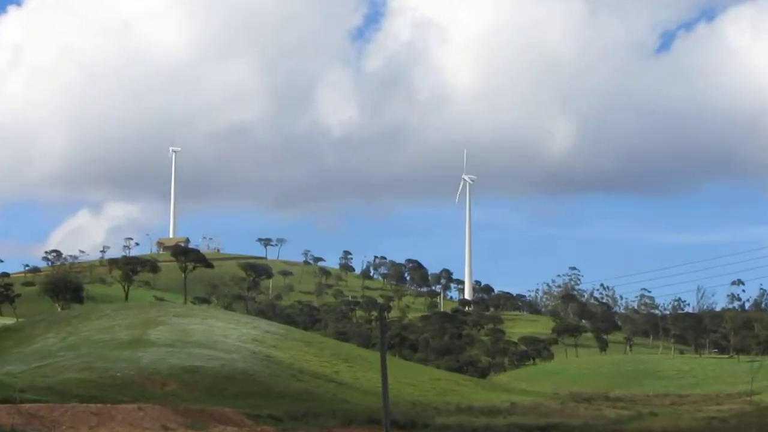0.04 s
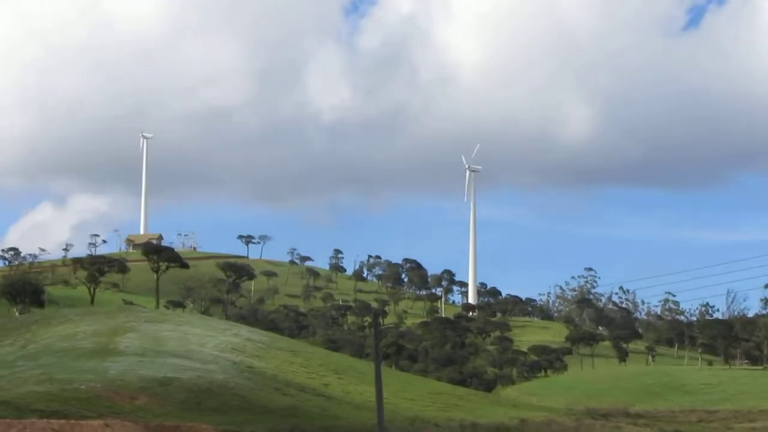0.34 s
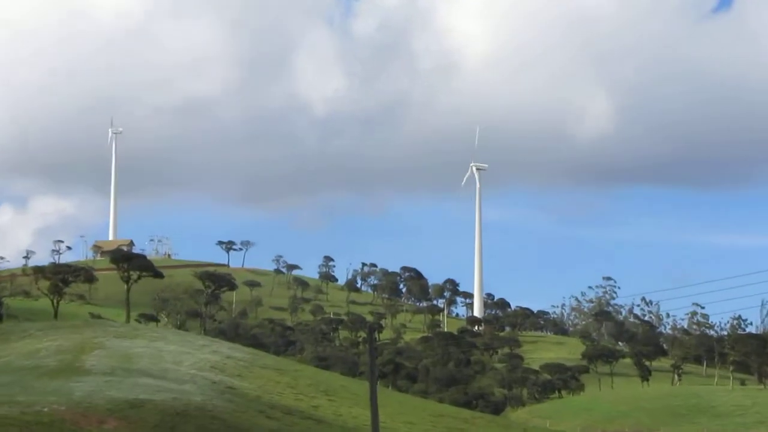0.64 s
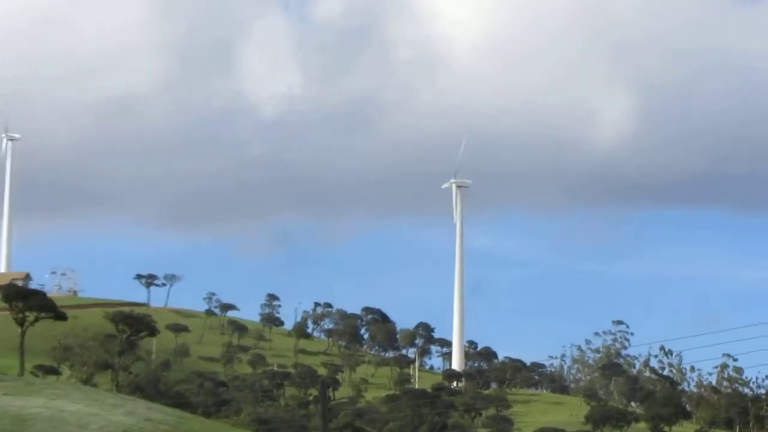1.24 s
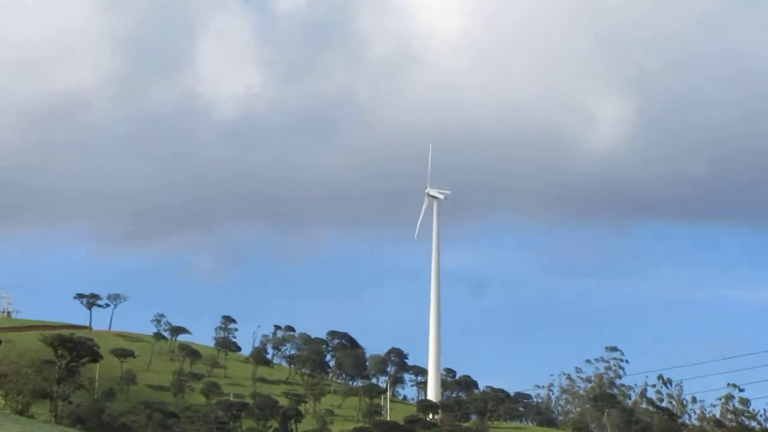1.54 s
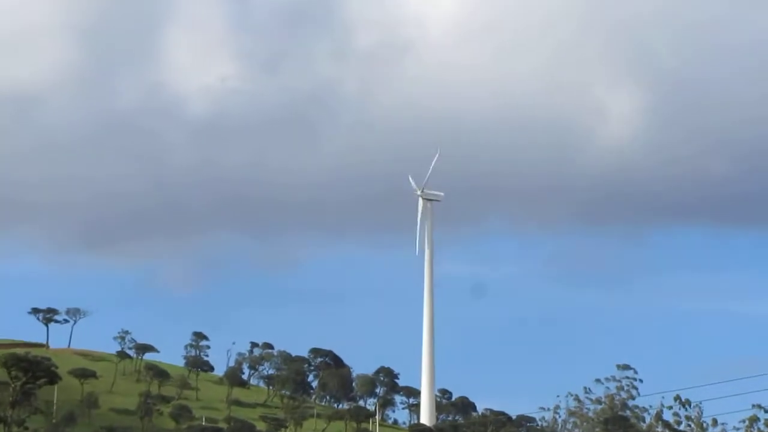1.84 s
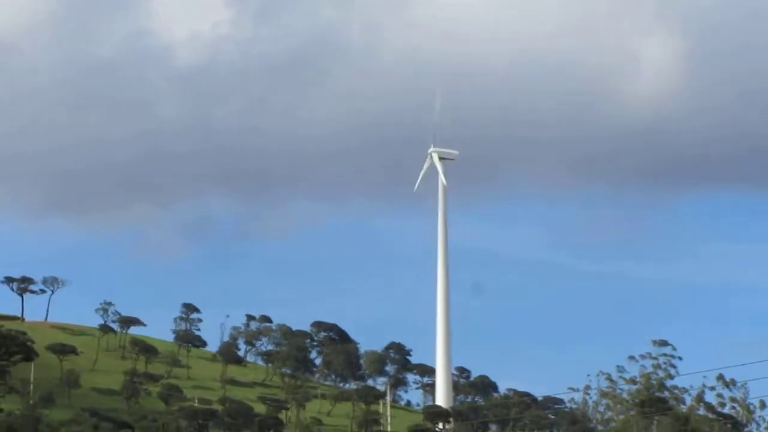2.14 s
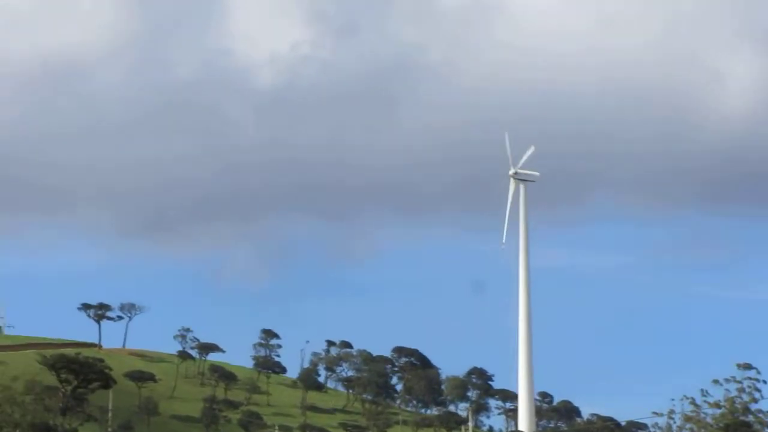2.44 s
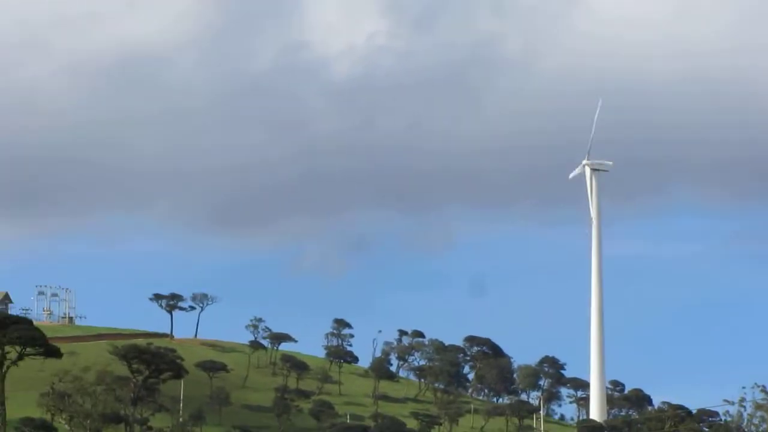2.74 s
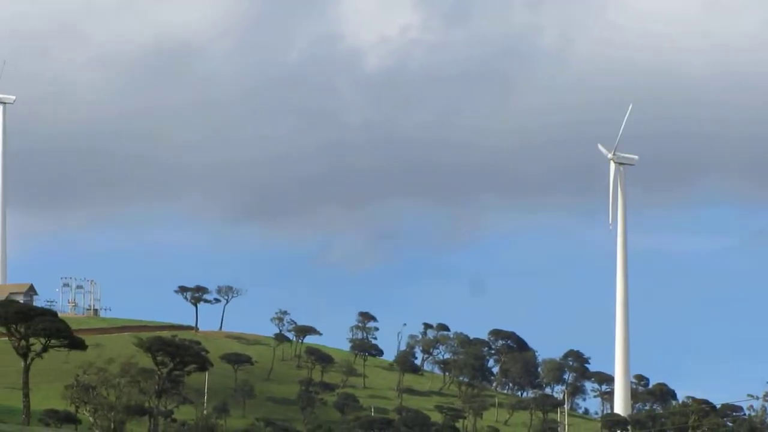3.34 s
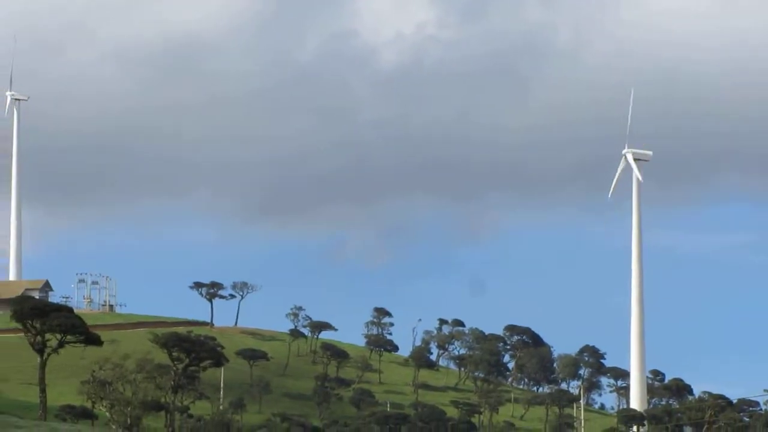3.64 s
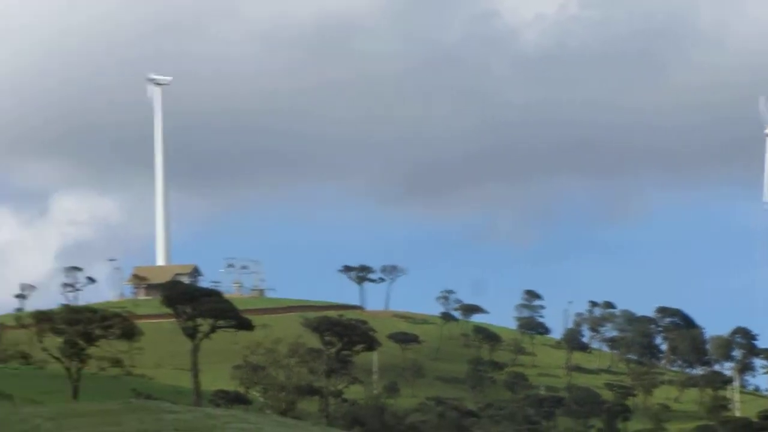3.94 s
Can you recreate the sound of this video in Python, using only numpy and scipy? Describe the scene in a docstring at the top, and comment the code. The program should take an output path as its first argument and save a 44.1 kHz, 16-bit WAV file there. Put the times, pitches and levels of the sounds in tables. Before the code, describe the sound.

Gusty wind rumbles against the microphone on an open hillside, turning rough and crackly.

```python
"""Wind buffets a camera's microphone in gusts on an open hillside. Eddies carry pressure fluctuations past the
port: a fluttering rumble that brightens and crackles as the air speeds up. The hardest eddies slap, and three
crisp clicks sound on both sides. The right channel is a duller, nearly inverted copy of the left. A faint hiss
lies below, and a limiter holds the peaks down."""
import sys
import numpy as np
from scipy import signal
from scipy.fft import rfft, irfft
from scipy.io import wavfile
from scipy.ndimage import uniform_filter1d, minimum_filter1d

SR = 44100
rng = np.random.default_rng(int(sys.argv[2]) if len(sys.argv) > 2 else 0)


def inscribe(sig):
    """Save sig as 16-bit PCM at rate SR to the path in sys.argv[1].

    A 1-D sig is mono; a 2-D sig holds one channel per row.
    Samples are clipped to [-1, 1] before scaling.
    """
    pcm = np.round(np.clip(np.atleast_2d(sig).T, -1, 1) * 32767)
    wavfile.write(sys.argv[1], SR, pcm.astype(np.int16))


N = 176400
TIME = np.arange(N) / SR
HZ = np.fft.rfftfreq(N, 1 / SR)

# wind at the microphone: t/s, relative level/dB, eddy rate/Hz (higher in faster air)
WIND_GUSTS = [(0.0, 4.5, 130), (0.012, -5, 102.7), (0.041, -6.5, 85), (0.074, -33, 140.6), (0.154, -2, 102),
              (0.197, -19.5, 113), (0.216, -4.5, 112.5), (0.341, -5, 138.4), (0.368, -9, 186.7),
              (0.388, -20.5, 89.5), (0.427, -4, 120.7), (0.483, -22, 109.5), (0.501, -6.5, 102.8),
              (0.519, -23, 79), (0.545, -2.5, 132.8), (0.599, -9, 141.4), (0.61, -6, 191),
              (0.658, -15.5, 89.3), (0.708, -6, 242), (0.735, -8, 140), (0.77, -5.5, 277),
              (0.782, -20, 148), (0.794, -8.5, 179.3), (0.899, -6.5, 263), (0.916, -12.5, 154),
              (0.973, -6, 246), (0.999, -6.5, 163), (1.061, -8, 213), (1.157, -7, 216.5),
              (1.172, -11, 150.3), (1.246, -6.5, 210.4), (1.288, -12, 106), (1.315, -3, 175),
              (1.356, -12.5, 123.7), (1.415, -2, 216), (1.443, -14, 182), (1.467, -2.5, 282),
              (1.481, -16.5, 120.4), (1.505, -8, 100.3), (1.509, -18.5, 194.5), (1.539, 0.5, 427),
              (1.576, -17.5, 131), (1.62, -6.5, 408), (1.653, -4, 169.3), (1.721, -3.5, 298),
              (1.755, -2.5, 254), (1.776, -15.5, 142), (1.798, -12.5, 161), (1.812, 3, 241),
              (1.842, -17, 187), (1.855, -11.5, 279), (1.911, -3, 285), (1.923, -12.5, 210),
              (1.973, -7.5, 159.7), (1.988, -19.5, 298), (2.0, -4.5, 320), (2.172, -7, 282),
              (2.192, -10.5, 192.7), (2.267, -5.5, 395), (2.328, -6.5, 279), (2.373, -7, 275),
              (2.406, -11, 206.5), (2.522, -6, 481), (2.558, -14.5, 268.4), (2.605, -3, 308),
              (2.648, -13.5, 220), (2.668, -2, 409), (2.735, -16, 211), (2.797, -5.5, 269),
              (2.818, -13, 257), (2.897, -4.5, 170), (2.925, -6.5, 257.5), (3.046, -9, 214),
              (3.059, -2.5, 231.3), (3.12, -13, 188), (3.136, -6, 234.6), (3.206, -10, 187.5),
              (3.274, -1.5, 235), (3.298, -7.5, 176), (3.36, -10, 317), (3.458, -6.5, 208.5),
              (3.47, -11, 181.4), (3.488, 0.5, 214), (3.511, -13.5, 154.5), (3.529, -5.5, 616),
              (3.549, -13.5, 168.6), (3.584, -10, 296), (3.604, -5.5, 144), (3.633, -9.5, 221.4),
              (3.702, -10.5, 183), (3.714, -7, 287), (3.733, -11.5, 340), (3.753, -11.5, 118),
              (3.791, -6.5, 189.4), (3.805, -33.5, 141), (3.824, -6.5, 301), (3.893, -13.5, 197),
              (3.905, 1, 206), (3.916, -14.5, 260), (3.993, -9, 105.5)]
# response of the microphone port: f/Hz, gain/dB
PORT_RESPONSE = [(20, -30.5), (35, -21.5), (55, -10), (90, -2.5), (140, 5), (250, 5), (460, 3.58),
                 (750, 3.76), (1150, 5.5), (1700, 2.85), (2400, 1), (3100, -2), (3900, -10), (6000, -14.5),
                 (12000, -22.5)]
# hard slaps of air: t/s, relative snap level/dB, relative body level/dB
AIR_SLAPS = [(1.1096, -65.5, -20), (1.2209, -69.5, -24), (1.463, -67.5, -20), (1.5395, -53.5, -20),
             (1.6182, -57.5, -18.5), (1.623, -58.5, -27.5), (1.8132, -51, -25.5), (1.8572, -63, -18),
             (1.8815, -58.5, -29.5), (1.9054, -53.5, -22.5), (1.9959, -50.5, -26.5), (2.0126, -51, -25),
             (2.0408, -56, -18.5), (2.0667, -50, -19), (2.1144, -51, -24), (2.1408, -55, -37),
             (2.2089, -62.5, -20), (2.2644, -41.5, -22.5), (2.2799, -50, -19), (2.3343, -59, -21),
             (2.4358, -64, -19), (2.5022, -54, -32), (2.601, -50.5, -23), (2.6206, -55, -17.5),
             (2.6724, -57, -18), (2.6848, -60, -21.5), (2.723, -55, -20), (3.2685, -68.5, -23.5),
             (3.4306, -58.5, -23), (3.5274, -50, -15), (3.5803, -61, -30), (3.712, -58.5, -27),
             (3.7296, -71, -21), (3.8247, -61, -16)]
# spectra of a slap's snap and of its body: f/Hz, gain/dB
SNAP_SPECTRUM = [(300, -20), (1500, 0), (3000, 0), (4200, -5), (7000, -11), (8500, -22), (10000, -36),
                 (14000, -56)]
BODY_SPECTRUM = [(30, -36), (70, -14), (150, -2), (500, 1), (1000, -1), (2000, -11), (3200, -29),
                 (5000, -60), (9000, -80)]
# crisp clicks: t/s, relative level/dB, attenuation on the right/dB
CLICK_EVENTS = [(0.3637, 16.5, 10.5), (.8935, 10.5, 12.5), (2.1637, 7, 8.5)]
# spectrum of a click: f/Hz, gain/dB
CLICK_SPECTRUM = [(30, -34), (200, 2.5), (600, 4), (1200, -4.5), (2200, -24), (3500, -33), (7000, -43),
                  (10000, -50.5), (15000, -62)]
# spectral density of the hiss: f/Hz, relative level/dB
HISS_SPECTRUM = [(100, 6), (1000, 2), (2000, 2.5), (3000, -3.5), (3500, -10), (4000, -13), (6500, -16.5),
                 (8100, -16.5), (8800, -19.5), (9600, -19), (10200, -17.5), (11200, -25.5), (13500, -24.5),
                 (15500, -34)]
# envelope of the hiss: t/s, level/dB
HISS_ENVELOPE = [(0, -63.5), (.355, -61), (.375, -67), (.85, -66), (1.35, -66.5), (1.8, -68), (2.3, -72),
                 (4, -73)]
# shading of the right channel: f/Hz, attenuation/dB
RIGHT_SHADE = [(50, 4), (170, 4.28), (500, 4.8), (800, 7.2), (1200, 9.2), (1700, 12.2), (2300, 16.4),
               (3000, 19), (6000, 42), (12000, 42)]
# phase lead of the right channel over the left: f/Hz, phase/rad
RIGHT_LEAD = [(20, 1.83), (170, 2.924), (300, 2.466), (500, 2.114), (800, 1.85), (1200, 2.16), (1700, 1.1),
              (3000, 0.27), (6000, .4)]
# likeness of the rumble in the two channels: f/Hz, correlation/1
CORRELATION = [(40, 0.89), (200, 0.93), (1000, 0.97), (3000, 1)]


def buffeting():
    """Faster flow shifts eddy pressure to higher frequencies. Gives spectra of two streams."""
    wind_db, ragged_eddy_hz = 4, 240
    pivot_hz, roll_off = 200, 0.76  # the spectrum tilts about the pivot
    times, level_db, eddy_hz = np.transpose(WIND_GUSTS)
    stirred = np.minimum(np.interp(TIME, times, eddy_hz) / ragged_eddy_hz, 1)  # slow air is smoother
    flutter = wobble(rate_hz=60)
    crackle = stirred * wobble(rate_hz=296)  # the smallest eddies
    level = amp(wind_db + np.interp(TIME, times, level_db) + flutter + 1.59 * crackle)
    eddy_rate = np.exp(np.interp(TIME, times, np.log(eddy_hz)) + .08 * flutter + .29 * crackle)
    streams = np.array([turbulence(), turbulence()]) * level
    steepness = eddy_rate ** -roll_off
    centres_hz = np.geomspace(40, 12000, 22)
    spectra = 0
    for hz, band in zip(centres_hz, np.eye(len(centres_hz))):  # overlapping triangular bands
        gain = np.exp((pivot_hz ** roll_off - hz ** roll_off) * steepness)
        spectra = spectra + rfft(streams * gain) * np.interp(HZ, centres_hz, band)
    return spectra * minimum_phase(PORT_RESPONSE)


def turbulence(kicks_per_s=220, kick_share=0.53):
    """Intermittency: single pressure kicks carry a share of the power, Gaussian churning the rest."""
    kicks = (rng.random(N) < kicks_per_s / SR) * rng.uniform(0.42, 1, N)
    churning = rng.standard_normal(N)
    return np.sqrt(1 - kick_share) * churning + np.sqrt(kick_share) * unit(kicks - kicks.mean())


def wobble(rate_hz):
    """Random modulation: the air swings as band-pass noise, falling off above the given rate."""
    ratio = HZ / rate_hz
    band_pass = ratio / (ratio + .15) / np.sqrt(1 + ratio ** 4)
    swing = unit(irfft(rfft(rng.standard_normal(N)) * band_pass, N))
    return np.clip(swing, -2.5, 2.5)


def slaps(peak_delay_s=.0012, fizz_s=.0015, fizz_db=-18.5):
    """Impulse excitation: one pressure spike gives a dull body and a ragged snap. Gives a spectrum."""
    snap, body, fizz_envelope = np.zeros((3, N))
    for start, snap_db, body_db in AIR_SLAPS:
        peak = min(round((start + peak_delay_s) * SR), N - 1)
        snap[peak], body[peak] = amp(snap_db + 34), amp(body_db + 35)
        fizz_envelope += snap[peak] * np.exp(-np.minimum(abs(TIME - TIME[peak]) / fizz_s, 20))
    snap += amp(fizz_db) * fizz_envelope * rng.standard_normal(N)
    return rfft(snap) * minimum_phase(SNAP_SPECTRUM) + rfft(body) * minimum_phase(BODY_SPECTRUM)


def sputter(max_ticks_per_s=140, onset_eddy_hz=188, full_eddy_hz=353):
    """Poisson process: the microphone ticks more often and harder in fast air. Gives a spectrum."""
    times, _, eddy_hz = np.transpose(WIND_GUSTS)
    force = np.interp(np.interp(TIME, times, eddy_hz), [onset_eddy_hz, full_eddy_hz], [0, 1])
    ticks = rng.random(N) < max_ticks_per_s * force / SR
    size = np.sqrt(force) * amp(-36 + np.clip(rng.standard_normal(N), -2, 2))
    polarity = rng.choice([-1, 1], N)
    return rfft(ticks * size * polarity) * minimum_phase(SNAP_SPECTRUM)


def clicks():
    """Antiphase impulses: crisp pressure spikes reach the two channels with opposite sign."""
    spikes = np.zeros((2, N))
    for start, level_db, shade_db in CLICK_EVENTS:
        spikes[:, round(start * SR)] = amp(level_db), -amp(level_db - shade_db)
    return irfft(rfft(spikes) * minimum_phase(CLICK_SPECTRUM), N)


def hiss():
    """Incoherent noise: a faint hiss, independent in each channel, that drops at the first click."""
    noise = irfft(rfft(rng.standard_normal((2, N))) * amp(curve_at(HISS_SPECTRUM, HZ)), N)
    level_db = np.interp(TIME, *np.transpose(HISS_ENVELOPE))
    return unit(noise) * amp(level_db)


def amp(db):
    """Decibel law: 20 dB is a factor of ten in amplitude."""
    return 10 ** (np.asarray(db) / 20)


def unit(x):
    """Normalisation to an rms of 1."""
    return x / np.sqrt(np.mean(x ** 2) + 1e-20)


def curve_at(points, hz):
    """Interpolation of a table on a logarithmic frequency axis."""
    table_hz, values = np.transpose(points)
    return np.interp(np.log(hz + 1), np.log(table_hz + 1), values)


def minimum_phase(points):
    """Causality: the filter's phase follows from its log gain by the Hilbert transform."""
    log_gain = np.log(amp(curve_at(points, abs(np.fft.fftfreq(N, 1 / SR)))))
    return np.exp(np.conj(signal.hilbert(log_gain)))[:len(HZ)]


def scene():
    """Superposition: the wind sounds on the left and, shaded and shifted in phase, on the right."""
    rumble, stray_rumble = buffeting()
    impacts = slaps() + sputter()
    likeness = np.clip(curve_at(CORRELATION, HZ), 0, 1)
    right_rumble = likeness * rumble + np.sqrt(1 - likeness ** 2) * stray_rumble
    shading = amp(-curve_at(RIGHT_SHADE, HZ))
    phase_shift = np.exp(1j * curve_at(RIGHT_LEAD, HZ))
    left = rumble + impacts
    right = (right_rumble + impacts) * shading * phase_shift
    return irfft(np.array([left, right]), N) + clicks() + hiss()


def record(dry, ceiling_db=-2.8, hold_s=.004, cutoff_hz=15700):
    """Soft-knee limiting: the gain dips briefly at peaks; a low-pass filter then limits the band."""
    hold = int(hold_s * SR)
    drive = abs(dry).max(0) / amp(ceiling_db)
    knee_gain = (1 + drive ** 6) ** (-1 / 6)
    held_gain = minimum_filter1d(knee_gain, 2 * hold)
    smooth_gain = uniform_filter1d(uniform_filter1d(held_gain, hold), hold)
    low_pass = signal.firwin(511, cutoff_hz, window=("kaiser", 9), fs=SR)
    return signal.oaconvolve(dry * smooth_gain, low_pass[None], "same")


dry = scene()
out = record(dry)
inscribe(out)
```